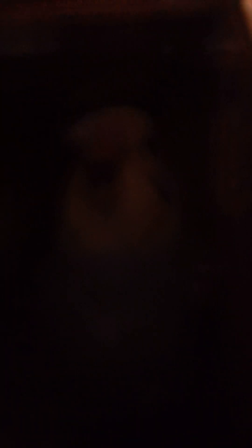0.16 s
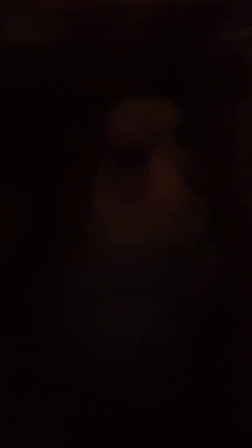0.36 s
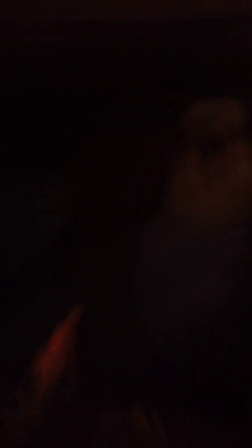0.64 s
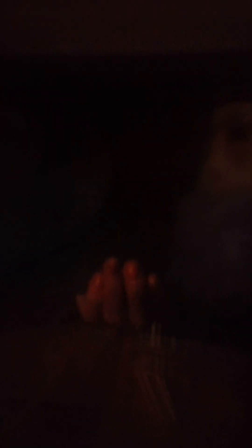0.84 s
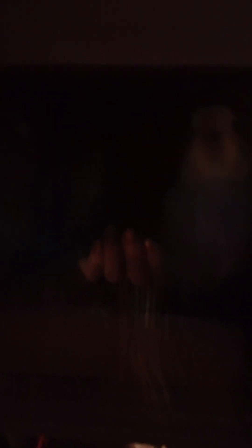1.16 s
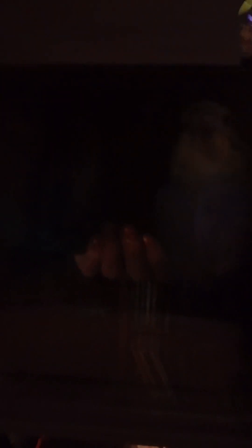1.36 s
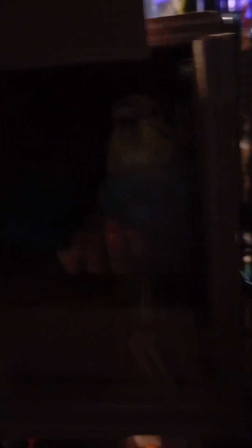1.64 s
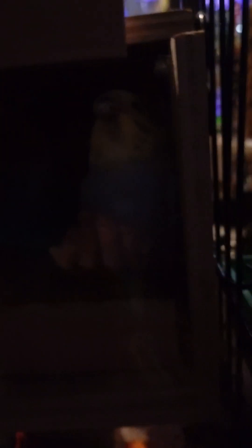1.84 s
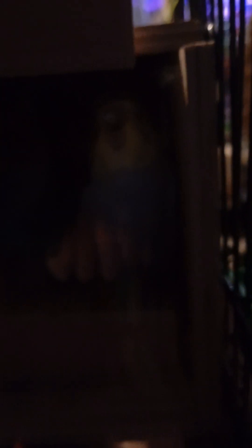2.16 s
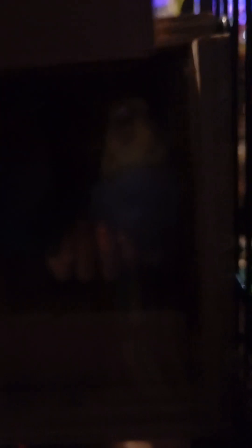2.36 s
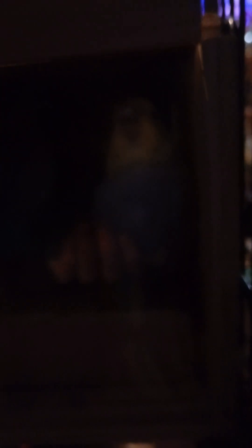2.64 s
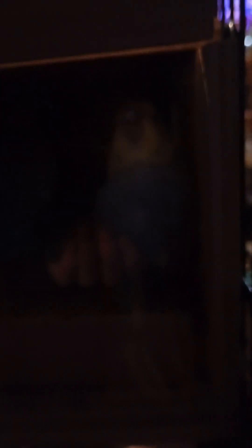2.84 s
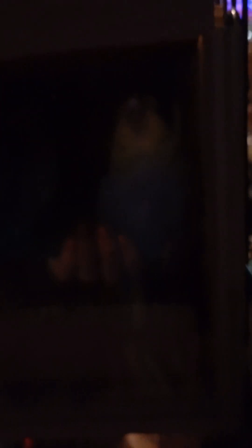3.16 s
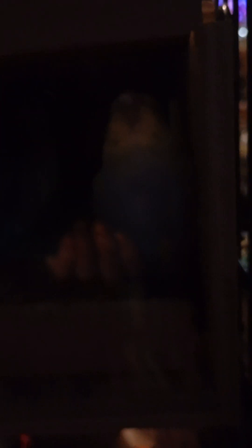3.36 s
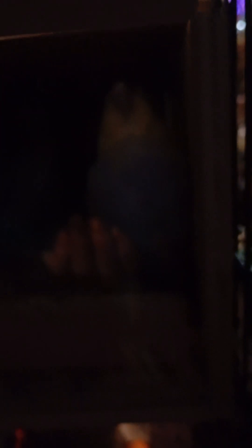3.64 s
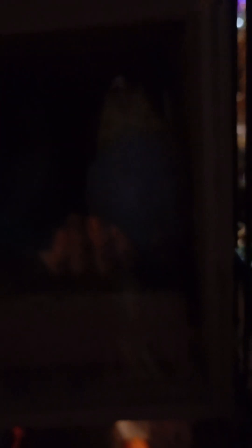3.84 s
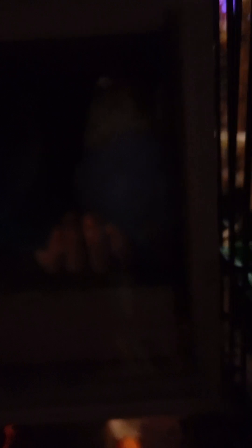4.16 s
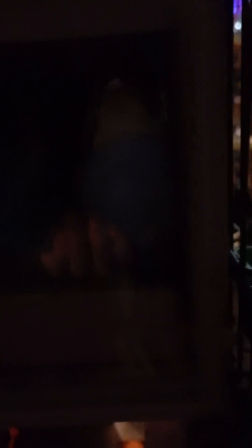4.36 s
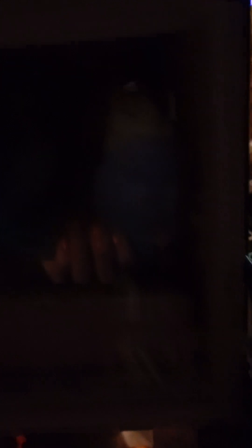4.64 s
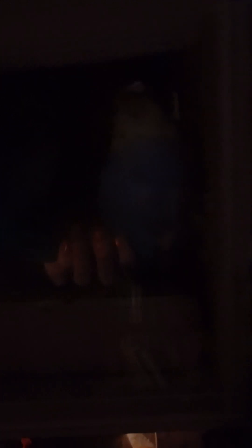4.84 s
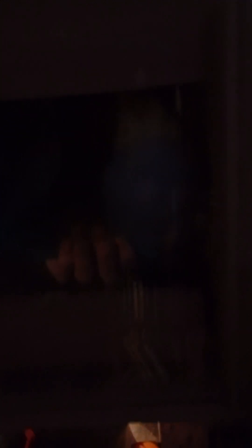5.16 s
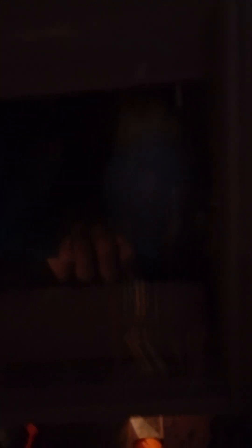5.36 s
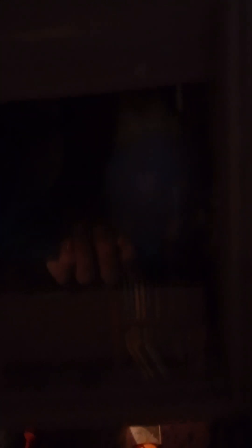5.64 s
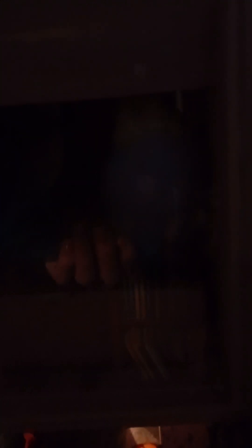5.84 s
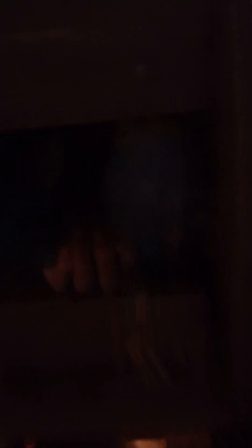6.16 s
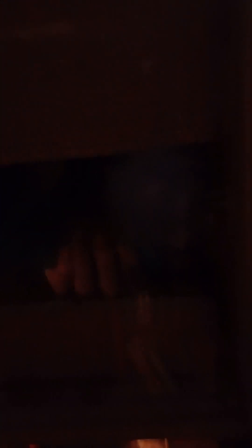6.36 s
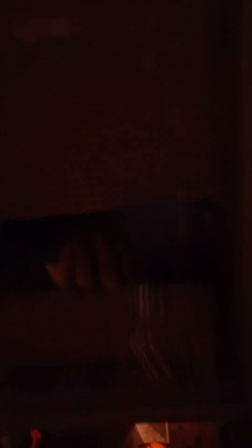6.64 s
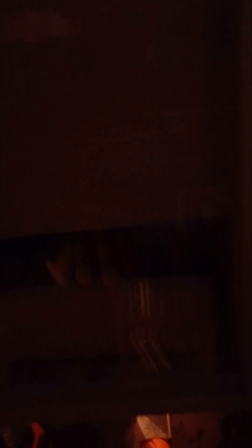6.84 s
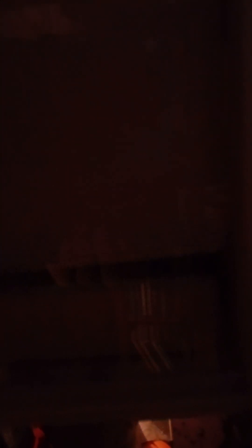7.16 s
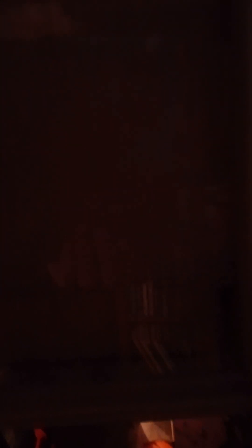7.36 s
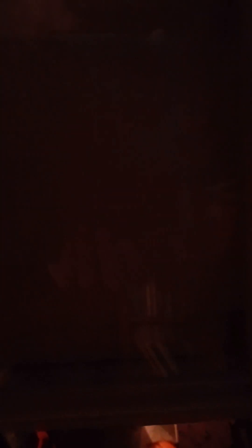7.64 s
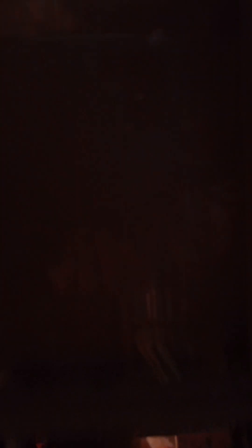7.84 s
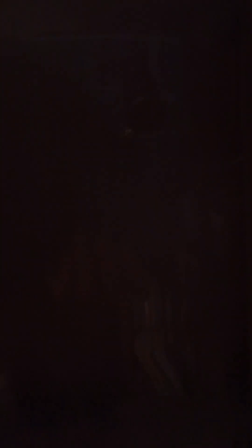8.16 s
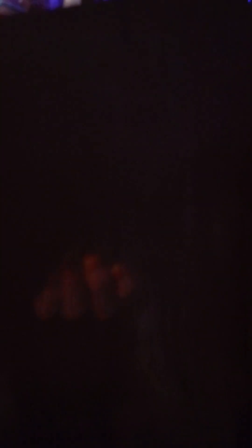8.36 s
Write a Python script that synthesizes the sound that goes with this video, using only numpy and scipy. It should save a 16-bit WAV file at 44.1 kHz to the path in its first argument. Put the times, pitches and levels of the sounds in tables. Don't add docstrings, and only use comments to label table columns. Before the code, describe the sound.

Close, raspy, fast-fluttering chatter from two caged chicks in a small wooden box, turning duller as a sliding door closes, then handling bumps.

```python
import sys
import numpy as np
from scipy import signal
from scipy.fft import rfft, irfft, next_fast_len
from scipy.io import wavfile
from scipy.ndimage import uniform_filter1d, map_coordinates

SR = 44100
rng = np.random.default_rng(int(sys.argv[2]) if len(sys.argv) > 2 else 0)


def to_linear_factor(level_db):
    exponent = np.asarray(level_db, float) / 20
    return 10 ** exponent


def wav_out(sig):
    wavfile.write(sys.argv[1], SR, np.round(np.clip(np.atleast_2d(sig).T, -1, 1) * 32767).astype(np.int16))


N = 375291

# start_s, length_s, level_db,
# beak_gape_db
RASP_CALLS = [(0.078, 0.079, -27, -1), (0.24, 0.093, -25.5, -11), (0.424, 0.089, -28, -2),
              (0.591, 0.072, -30, 5.5), (0.912, 0.098, -32.5, -8.5), (1.102, 0.11, -33.5, -7.5),
              (1.308, 0.11, -26.5, 4), (1.5, 0.13, -30.5, 9), (1.711, 0.1, -31.5, 2),
              (1.886, 0.12, -31, -1.5), (2.094, 0.11, -29, -4.5), (2.282, 0.099, -28.5, -5),
              (2.466, 0.1, -31, -5.5), (2.666, 0.097, -30, -8), (2.858, 0.11, -29.5, -6.5),
              (3.05, 0.1, -29, -9.5), (3.243, 0.098, -30, -10), (3.437, 0.11, -31, -4.5),
              (3.636, 0.12, -32, -4), (3.834, 0.11, -30.5, -6.5), (4.036, 0.1, -31.5, -5),
              (4.229, 0.13, -30.5, -4), (4.44, 0.11, -30, -8), (4.646, 0.11, -33, -5.5),
              (4.846, 0.11, -31, -8), (5.044, 0.12, -31, -14), (5.262, 0.11, -32.5, -11),
              (5.48, 0.12, -32, -10.5), (5.705, 0.12, -34, -10), (5.949, 0.12, -30, -19),
                (6.272, 0.12, -29, -9), (6.471, 0.14, -27, -10), (6.686, 0.13, -23.5, -7),
                (6.893, 0.12, -24.5, -9), (7.107, 0.13, -26, -9.5), (7.328, 0.13, -25.5, -24),
                (7.555, 0.13, -26, -13), (7.78, 0.12, -26.5, -5), (7.987, 0.13, -28, -6),
                (8.194, 0.12, -28, -0.5), (8.404, 0.34, -30, -2)]
# time_s, treble_db
FACING = [(0.08, -5), (0.42, -6.5), (0.6, -2), (0.91, 3), (1.31, -4), (1.72, 1.5), (2.28, 6), (3.05, 2.5),
          (3.44, 4), (4.23, 4.5), (4.65, 5), (5.04, 4), (5.7, 5.5), (5.95, -1), (6.27, -1.5), (6.7, -9),
          (7.6, -9), (8.2, -6.5)]
# time_s, top_db
SIGHT = [(0, -15), (0.55, -16), (0.9, -20.5), (1.5, -21), (1.75, -21), (3.0, -20), (3.8, -18), (5.3, -23.5),
         (6.5, -16), (7.6, -16.5), (8.5, -15)]
# pitch_hz, level_db
NEAR_COLOUR = [(290, -81), (500, -24), (916, -12.5), (1150, -7), (1370, -10), (1470, -12), (2660, 1),
               (3120, -21), (4160, -5), (5880, 3), (7410, -15), (8550, -20.5), (15700, -46)]
# pitch_hz, level_db
OPEN_COLOUR = [(290, -54), (500, -19.5), (890, -10), (1140, -12), (1470, 3.5), (1830, -7.5), (2510, 3.5),
               (3980, -18), (4880, -8.5), (5880, -1), (6990, -20), (9740, -33), (11700, -40), (15700, -48)]
# pitch_hz, level_db
AWAY_COLOUR = [(290, -86), (500, -23), (903, -12), (1310, -10.5), (1540, -0.5), (1730, -18), (2370, 0.5),
               (2820, -15), (3450, -10), (4040, -15.5), (5090, -8.5), (6500, -16.5), (8500, -31),
               (15700, -63)]
# pitch_hz, level_db
AJAR_COLOUR = [(290, -73), (500, -25), (1170, -17), (1430, -4.5), (2080, -7), (2300, -9.5), (2590, -11),
               (3980, -19.5), (5160, -6), (6410, -0.5), (7730, -33.5), (11600, -34.5), (15700, -47)]
# pitch_hz, level_db
SHUT_COLOUR = [(290, -70), (500, -31), (1030, -17), (1260, -4), (1730, -15.5), (2410, -2.5), (3400, -37.5),
               (4880, -13), (5240, -11.5), (6600, -7.5), (8070, -34.5), (12600, -32), (15700, -47)]
STAGES = [
    .7,
    .9,
    1.28,
    1.3,
    1.65,
    1.7,
    5.4,
    6.7,
    7.2,
    7.85,
]
# pitch_hz, width_hz, level_db
MOUTH = [(1550, 55, 5), (2420, 320, 0), (3175, 390, 0.5), (3760, 330, -3), (5040, 130, 3), (5810, 304, 4.5),
         (8300, 490, 2.5), (9480, 500, -2), (10370, 520, 0), (11950, 800, 1), (12800, 300, -1),
         (14500, 400, -1), (15400, 400, 2), (13500, 910, -11)]
# time_s, lower_over_upper_db, top_db
TONGUE = [(0.08, 1, -4), (0.24, -3, 5), (0.6, -6, -13), (0.91, 4.5, -4), (1.5, -1.5, -16), (2.1, -2, 1),
          (2.7, -3.5, -4), (3.05, -4.5, -3), (3.6, -2, 3.5), (4.2, 0.5, -3), (4.65, -1, 5),
          (5.04, 7.5, 9.5), (5.5, 4, 8), (5.95, 4, 4), (6.5, 0.5, -3), (7.1, 10, -2), (7.8, -7.5, -10),
          (8.4, -4, 2)]

# start_s, length_s, first_db, last_db,
# pitch_hz
PIPE_RAMPS = [(0.0, 0.0076, -22, -42, 2190), (0.075, 0.15, -26.5, -18, 2465),
              (0.245, 0.1094, -22, -19, 2626), (0.363, 0.14, -18, -25.5, 2476),
              (0.531, 0.14, -17.5, -24.5, 2380), (0.741, 0.016, -28.5, -12, 2680),
              (0.778, 0.099, -20, -19, 2420), (1.174, 0.13, -24.5, -17, 2500), (1.42, 0.21, -22, -24, 2422),
              (1.65, 0.16, -24.5, -20, 2444), (1.925, 0.12, -19.5, -21.5, 2437),
              (2.136, 0.13, -22.5, -19, 2420), (2.594, 0.155, -21.5, -20.5, 2444),
              (2.829, 0.15, -22.5, -20, 2420), (3.084, 0.17, -24, -17.5, 2443),
              (3.344, 0.21, -28, -19.5, 2546), (3.649, 0.12, -25, -24, 2690),
              (3.761, 0.28, -19.5, -27.5, 2634),
              (3.969, 0.156, -24.5, -19.5, 2453), (4.216, 0.18, -22, -18.5, 2342),
             (4.786, 0.2, -25, -18, 2420), (5.071, 0.18, -20, -19, 2420), (5.614, 0.18, -22, -16.5, 2486),
             (5.889, 0.17, -20, -17.5, 2517), (6.149, 0.21, -20.5, -15.5, 2500),
             (6.446, 0.16, -18.5, -16.5, 2530), (6.785, 0.105, -25, -22.5, 2370),
             (6.99, 0.18, -30.5, -20, 2473), (7.823, 0.15, -29.5, -25, 2500),
             (8.081, 0.18, -32.5, -25, 2428), (8.364, 0.16, -28, -29, 2500)]
# start_s, length_s, peak_place (0 to 1), peak_db, pitch_hz
PIPE_SWELLS = [
    (0.957, 0.14, 0.95, -16.5, 2420),
    (2.37, 0.17, 0.56, -19, 2344),
    (4.54, 0.16, 0.75, -17.5, 2445),
    (5.358, 0.18, 0.57, -16.5, 2448),
    (7.259, 0.19, 0.64, -20, 2420),
    (7.507, 0.19, 0.66, -22, 2390),
]
SWELL_DB, FADE_DB = 8, 5.5
RELEASE_DB_PER_S, RELEASE_S = 1047.5, 0.02
SAG_HZ_PER_S, OCTAVE_SAG_DB_PER_S = 294, 14.5
WANDER, WANDER_S = .03, .025
SCOOP_LOSS = 0.14
SMACK_LEAD_S, SMACK_DB, SMACK_T60_S = 0.004664, -9.5, 0.023
# time_s, overtone_db at the start of a call
GAPE = [(0, 4), (0.2, 1.5), (0.45, 5), (0.7, -2), (2.0, -1.5), (3.3, -1.5), (3.9, -4), (4.3, -1.5),
        (5.4, -10), (5.9, -7.5), (6.5, -20.5), (6.9, -12), (7.4, -16), (8.0, -7), (8.5, -31)]
# pitch_hz, width_hz, level_db
THROAT = [
    (2500, 4000, -1),
    (5720, 450, 6.5),
    (7400, 3700, -9),
    (10900, 3000, -1),
]
# pitch_hz, width_hz, level_db
WHISPER = (5540, 490, -12.5)
# time_s, echo_db
PIPE_FLUTTER = [
    (0.7, -9),
    (1.0, -3),
    (4.5, -3),
    (6.0, -5),
]

# pitch_hz, width_hz, level_db
BOX = [(919, 58, 10), (2420, 95, 3), (3300, 820, 3), (4983, 266, 6), (5740, 78, 1), (8600, 460, 2.5),
       (11960, 880, 7.5), (15270, 330, 3)]
# pitch_hz, width_hz, level_db
FLOOR_ECHOES = [(1334, 118, -6.5), (4020, 960, -7.5), (7600, 380, 0.5), (9700, 540, -2.5),
                (13700, 700, 8.5)]
# pitch_hz, width_hz, level_db
CLOSED_BOX = [(922, 90, -1.5), (1370, 160, 4), (1823, 260, -8), (3660, 260, -2), (4185, 240, 9.5),
              (4800, 400, -15.5), (5470, 180, 7.5), (5850, 290, -8), (6170, 260, 3.5)]
# start and end, time_s
CLOSING_S = [6.35, 7.37]
# delay_s, level_db
WALLS = [
    (.0029, -25.5),
    (.0071, -27.5),
]
# pitch_hz, t60_s
ROOM = [(500, 0.24), (2500, 0.11), (3900, 0.095), (5600, 0.16), (12000, 0.12)]
FLUTTER_T60_S, FLUTTER_OPEN_DB, FLUTTER_SHUT_DB = 0.042, -5, -1

# start_s, peak_db, pitch_hz, t60_s, tick_db
KNOCKS = [(1.616, -18, 152, 0.023, 9.5), (3.502, -44, 109, 0.071, 1), (3.885, -18.5, 376, 0.009, -2),
          (4.009, -38, 330.3, 0.064, -4), (4.254, -26.5, 436, 0.12, 2), (4.256, -27, 322, 0.06, -10),
          (4.266, -31, 627, 0.075, 13), (4.284, -31, 520, 0.026, -4), (4.6, -31, 151, 0.03, 5),
          (4.872, -39, 302, 0.12, 5), (4.925, -32.5, 135, 0.027, 0), (4.935, -37, 260, 0.04, -10),
          (5.451, -40.5, 180, 0.031, 2), (5.54, -34.5, 107.3, 0.05, 11), (5.942, -34, 169, 0.032, -21),
          (8.142, -41.5, 234, 0.16, -7), (8.437, -3.5, 125.5, 0.023, -4), (8.478, -25, 300, 0.033, -10),
          (8.492, -12.5, 424, 0.01, -3)]
PANEL_BEND = 0.55
THUMP_HZ, THUMP_DB, THUMP_T60_S = 75, -17, 0.066
# peak_s, rise_s, fall_s, peak_db
SLIDES = [
    (0.15, 0.37, 0.43, -70),
    (4.17, 0.45, 0.46, -61.5),
    (6.3, 0.32, 0.46, -61),
    (6.7, 0.65, 0.24, -55),
    (7.17, 0.14, 0.54, -53.5),
    (7.92, 0.48, 0.057, -48.5),
]
SLIDE_REST_DB = -72.5
# time_s, level_db
GRIP = [(0, -72.5), (3.7, -70.5), (4.03, -70), (4.3, -68.5), (7.9, -71), (8.25, -62), (8.28, -49),
        (8.36, -48), (8.39, -56.5), (8.46, -48), (8.51, -34.5)]
# pitch_hz, level_db
AIR = [(15, -29), (25, 9), (205, -6), (540, -21), (766, 8.5), (1210, 0), (2440, 5.5), (3900, -7),
       (5480, -3), (8660, -17.5), (15700, -39)]


def unit(x):
    return x / np.sqrt(np.mean(x ** 2) + 1e-20)


def along(points, hz):
    f, v = np.transpose(points)
    return np.interp(np.log(hz + 1), np.log(f + 1), v)


def filtered(x, response):
    m = next_fast_len(N + 8192)
    return irfft(rfft(x, m) * response(np.fft.rfftfreq(m, 1 / SR)), m)[..., :N]


def above(f, edge_hz):
    return 1 / (1 + (edge_hz / (f + 1)) ** 16)


def resonance(f, hz, width_hz):
    return 1j * f * width_hz / (hz * hz - f * f + 1j * f * width_hz)


def squeaks(n, rate_hz, jitter):
    draw = rng.standard_normal((int(n * rate_hz / SR * 1.5) + 4, 4))
    ends = np.cumsum(SR / rate_hz * np.exp(jitter * np.clip(draw[:, 0], -2, 2)))
    count = np.interp(np.arange(n), np.r_[0, ends], np.arange(len(ends) + 1))
    return count % 1, np.clip(draw[count.astype(int), 1:].T, -1.6, 1.6)


def rasp():
    voice, gains = np.zeros(N), np.zeros((4, N))
    for s, length, low_db, beak_db in RASP_CALLS:
        bright_db = np.interp(s, *np.transpose(FACING))
        air_db = np.interp(s, *np.transpose(SIGHT)) + bright_db
        i = round(s * SR)
        t = np.arange(min(round((length + 0.011) * SR), N - i)) / SR
        u, (size, tune, bend) = squeaks(len(t), 119, jitter=.11)

        hz = (800 + 2100 * u ** 1.1 * np.exp(.25 * bend)) * np.exp(.1 * tune)
        hz *= np.exp(0.2043 * uniform_filter1d(rng.standard_normal(len(t)), size=40))
        k = np.arange(1, 17)[:, None]
        turn = k * np.cumsum(2 * np.pi * hz / SR) + 0.97 * k ** 2
        buzz = unit(np.sum(np.cos(turn) * k ** -.4 * (k * hz < 16500), axis=0))
        breath = .1 * rng.standard_normal(len(t))

        gate = np.clip(u / .1, 0, 1) * np.clip((.9 - u) / .25, 0, 1)
        gate += np.interp(s, [5.5, 7.2], [.05, .25])
        swell = np.clip(t / 0.0025, .01, 1) * np.clip(t / 0.014, .45, 1)
        swell *= to_linear_factor(-3.5 * t / length - 3400 * np.maximum(t - length, 0))
        call = (buzz + breath) * gate * to_linear_factor(1.8 * size) * swell
        voice[i:i + len(t)] = mouth(flutter(call, s, more_db=-3.5), s)
        region_db = np.array([[0], [beak_db + 12.5], [bright_db + 1.0], [air_db + 25.5]])
        gains[:, i:i + len(t)] = to_linear_factor(low_db + region_db)

    edges = [lambda f: 1, lambda f: above(f, 2800), lambda f: above(f, 4100), lambda f: above(f, 7800), lambda f: 0]
    shaped = sum(filtered(gains[b] * voice, lambda f: edges[b](f) - edges[b + 1](f)) for b in range(4))

    order = [0, 1, 1, 2, 2, 1, 1, 3, 3, 4]
    shares = [np.interp(np.arange(N) / SR, STAGES, row) for row in np.eye(5)[:, order]]
    colours = (NEAR_COLOUR, OPEN_COLOUR, AWAY_COLOUR, AJAR_COLOUR, SHUT_COLOUR)
    heard = [filtered(shaped, lambda f: to_linear_factor(along(colour, f))) for colour in colours]
    return to_linear_factor(13.5) * sum(share * sound for share, sound in zip(shares, heard))


def mouth(call, s):
    f = np.fft.rfftfreq(len(call) + 512, 1 / SR)
    shift = np.exp(.018 * rng.standard_normal(len(MOUTH)))
    when, lean_db, top_db = np.transpose(TONGUE)
    hz = np.transpose(MOUTH)[0]
    lower, upper = (abs(hz - 4950) < 400) * 1., abs(hz - 5800) < 400
    extra_db = np.interp(s, when, lean_db) * (lower - upper)
    extra_db += np.interp(s, when, top_db) * (abs(hz - 11900) < 900)
    extra_db += 4 * rng.standard_normal(len(hz)) * (hz > 7000)
    turned = STAGES[2] < s < STAGES[4]
    extra_db += 0.5 * turned * (abs(hz - 3320) < 300)
    parts = [1 + (to_linear_factor(db + more) - 1) * resonance(f, c * k, w)
             * 1 for (c, w, db), k, more in zip(MOUTH, shift, extra_db)]
    return irfft(rfft(call, len(call) + 512) * np.prod(parts, axis=0), len(call) + 512)[:len(call)]


def pipe():
    out, smack, whisper = np.zeros((3, N))
    ramps = [(s, length, .5, (first, (first + last) / 2, last), hz)
             for s, length, first, last, hz in PIPE_RAMPS]
    swells = [(s, length, peak, (db - SWELL_DB, db, db - FADE_DB), hz)
              for s, length, peak, db, hz in PIPE_SWELLS]
    for begin, length, peak, hold_db, mean_hz in sorted(ramps + swells):
        s = begin + np.array([0, peak * length, length, length + RELEASE_S])
        db = [*hold_db, hold_db[-1] - RELEASE_DB_PER_S * RELEASE_S]
        pitch_hz = mean_hz - SAG_HZ_PER_S * (s - begin - length / 2)
        octave_db = np.interp(begin, *np.transpose(GAPE)) - OCTAVE_SAG_DB_PER_S * (s - begin)
        i = round(s[0] * SR)
        t = np.arange(i, min(round(s[-1] * SR), N)) / SR
        u, (size, tune, bend) = squeaks(len(t), 118, jitter=.15)

        ajar = np.interp(begin, [.8, 1.2, 4.5, 5.7, 7.0], [1.0, .8, .8, .4, .2])
        scoop = ajar * (.55 * np.exp(.6 * bend - (u / .25) ** 2) - .14 * (u - .5) * (1 + bend))
        scoop *= np.clip((t - begin) / .02, .35, 1)
        drift = map_coordinates(rng.standard_normal(16), [(t - begin) / WANDER_S])
        start = WANDER * drift + 0.07544 * np.exp(-((begin - t) / 0.02479) ** 2)
        hz = np.interp(t, s, pitch_hz) * np.exp(.05 * ajar * tune - scoop + start + .015)
        rough = np.exp(0.2016 * uniform_filter1d(rng.standard_normal(len(t)), size=30))
        phase = np.cumsum(2 * np.pi * hz / SR * rough)

        gate = (.35 + .65 * np.sin(np.pi * u ** 1.2)) * np.clip(u / .12, 0, 1) * np.clip((.92 - u) / .25, 0, 1)
        gate += .02
        onset = np.clip((t - begin) / .006, .3, 1)
        upper = np.cos(2 * phase) + 0.407 * np.cos(3 * phase) + 0.38 * np.cos(4 * phase) + 0.3 * np.cos(5 * phase)
        odd = np.interp(begin, [1.2, 3.2, 6.5], [.95, .45, .1]) * to_linear_factor(-3.0) * np.cos(phase * 3 / 2) * (tune > .5)
        tone = np.cos(phase) + odd + to_linear_factor(np.interp(t, s, octave_db) - 4.5) * u * 2 * upper
        breath = ajar * to_linear_factor(-18) * uniform_filter1d(rng.standard_normal(len(t)), size=3)

        j = max(i - round(SMACK_LEAD_S * SR), 0)
        smack_db = db[0] + SMACK_DB - 60 * np.arange(900) / SR / SMACK_T60_S
        smack[j:j + 900] += to_linear_factor(smack_db) * rng.standard_normal(900)

        call = gate * onset * (tone * np.exp(-SCOOP_LOSS * np.abs(scoop)) + breath)
        call *= to_linear_factor(np.interp(t, s, db) + 2.2 * size + drift + 3)
        out[i:i + len(t)] += flutter(call, begin, np.interp(begin, *np.transpose(PIPE_FLUTTER)))
        whisper_level = (1 - ajar) * to_linear_factor(np.interp(t, s, octave_db + db[0]))
        whisper[i:i + len(t)] += whisper_level * gate * onset * rng.standard_normal(len(t))

    throat = lambda f: sum((-1) ** k * to_linear_factor(db) * resonance(f, c, w) for k, (c, w, db) in enumerate(THROAT))
    ring_hz, width_hz, ring_db = WHISPER
    ring = filtered(whisper, lambda f: 1 / (1 + (2 * (f - ring_hz) / width_hz) ** 2))
    whistle = filtered(out, lambda f: above(f, 1370) * (1 - 0.943 * above(f, 7440)) * throat(f))
    return to_linear_factor(ring_db + 24.5) * ring + whistle + filtered(smack, lambda f: above(f, 740) - above(f, 2500))


def flutter(call, s, more_db):
    t = np.arange(1500) / SR
    hits = rng.standard_normal(len(t)) * (rng.random(len(t)) < .06)
    echo = hits * to_linear_factor(-60 * t / FLUTTER_T60_S) * (t > .0004)
    wet = to_linear_factor(more_db + np.interp(s, CLOSING_S, [FLUTTER_OPEN_DB, FLUTTER_SHUT_DB]))
    echoed = signal.fftconvolve(call, echo / np.linalg.norm(echo))[:len(call)]
    return (call + wet * echoed) / np.sqrt(1 + wet ** 2)


def space(x, room_db):
    x = filtered(x, lambda f: 1 + sum((to_linear_factor(db) - 1) * resonance(f, c, w) for c, w, db in BOX + FLOOR_ECHOES))
    shut = np.interp(np.arange(N) / SR, CLOSING_S, [0, 1])
    closed = lambda f: np.prod([1 + (to_linear_factor(db) - 1) * resonance(f, c, w) for c, w, db in CLOSED_BOX], axis=0)
    x = (1 - shut) * x + shut * filtered(x, closed)
    walls = lambda f: 1 + sum((-1) ** k * to_linear_factor(db) * np.exp(-2j * np.pi * f * s) for k, (s, db) in enumerate(WALLS))
    box = filtered(x, walls)
    hz, t, z = signal.stft(rng.standard_normal(SR // 2), SR, nperseg=256)
    tail = signal.istft(z * to_linear_factor(-60 * t / along(ROOM, hz)[:, None]), SR, nperseg=256)[1]
    return to_linear_factor(0.5) * box + to_linear_factor(room_db) * signal.fftconvolve(x, tail / np.linalg.norm(tail))[:N]


def knocks():
    out, t = np.zeros(N + SR), np.arange(SR // 4) / SR
    thump = to_linear_factor(THUMP_DB - 60 * t / THUMP_T60_S) * np.sin(2 * np.pi * THUMP_HZ * t)
    for s, db, hz, t60, tick_db in KNOCKS:
        bent_t = t + PANEL_BEND * 0.0033 * (1 - np.exp(-t / 0.0011))
        panel = np.sin(2 * np.pi * hz * bent_t) * to_linear_factor(-60 * t / max(t60, .01))
        tick = to_linear_factor(tick_db - 8.5 - 60 * t / 0.014) * np.sin(2 * np.pi * 670 * t)
        dull = uniform_filter1d(uniform_filter1d(rng.standard_normal(len(t) + 1), size=60), size=30)
        puff = to_linear_factor(-9.5 - 60 * t / 0.047) * unit(np.diff(dull))
        attack = 1 - np.exp(-t / 0.00051)
        out[round((s + .001) * SR):][:len(t)] -= to_linear_factor(db) * (panel + tick + puff + thump) * attack
    return filtered(out[:N], lambda f: 1 - above(f, 2500))


def sliding_door():
    t = np.arange(N) / SR
    strokes = [np.interp(t, [s - rise, s, s + fall], [SLIDE_REST_DB, db, SLIDE_REST_DB])
               for s, rise, fall, db in SLIDES]
    drone = lambda f: 1 / (1 + ((f - 270) / 60) ** 2) + 0.26 * (f > 400) * (f < 850)
    return to_linear_factor(np.max(strokes, axis=0) + 4.0) * unit(filtered(rng.standard_normal(N), drone))


def gripping_hand():
    grip_db = np.interp(np.arange(N) / SR, *np.transpose(GRIP))
    rumble = lambda f: 1 / (1 + ((f - 105) / 25) ** 2) + 8 / (f + 25)
    return to_linear_factor(grip_db + 5.0) * unit(filtered(rng.standard_normal(N), rumble))


def room_tone():
    t = np.arange(N) / SR
    air = unit(filtered(rng.standard_normal(N), lambda f: to_linear_factor(along(AIR, f))))
    hum = unit(filtered(rng.standard_normal(N), lambda f: 1 / (1 + ((f - 345) / 22) ** 2)))
    air_db = -56.0 + np.interp(t, [5.5, 7.5], [0.1, -3])
    hum_db = -66.5 + np.interp(t, [5.5, 7], [0.1, -8])
    return to_linear_factor(air_db) * air + to_linear_factor(hum_db) * hum


def scene():
    chicks = space(rasp() + pipe(), room_db=-14.0)
    return (chicks + knocks() + sliding_door() + gripping_hand() + room_tone())[None]


def low_pass(x):
    return signal.sosfilt(signal.butter(12, 15820, fs=SR, output="sos"), x)


def record(dry):
    rounded = dry / (1 + np.abs(dry / 0.95) ** 4) ** .25
    mix = filtered(rounded, lambda f: (1j * f / (48 + 1j * f)) ** 4 * (f < 15830))
    return low_pass(mix)


dry = scene()
out = record(dry)
wav_out(out)
```